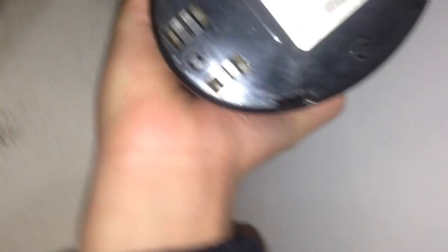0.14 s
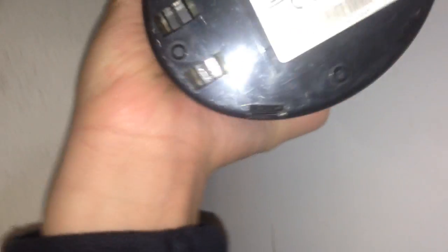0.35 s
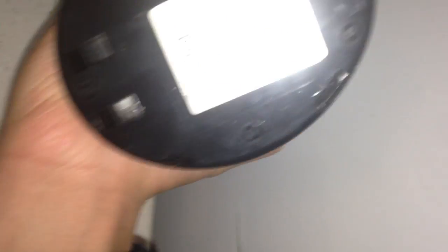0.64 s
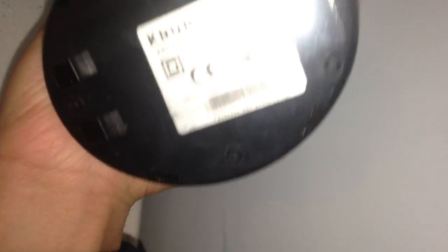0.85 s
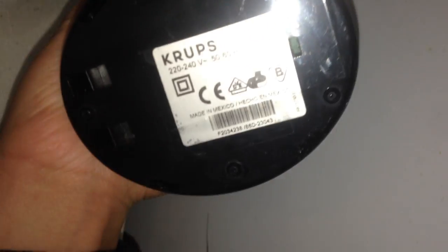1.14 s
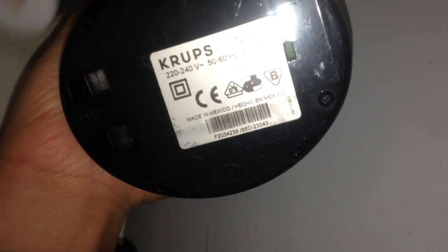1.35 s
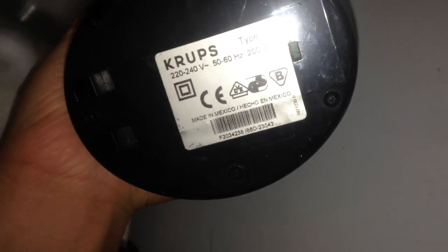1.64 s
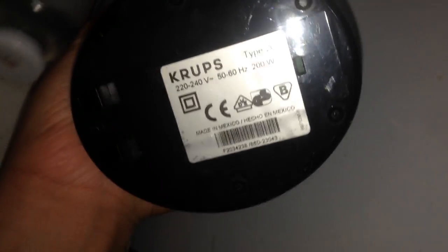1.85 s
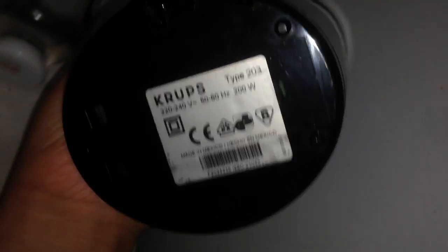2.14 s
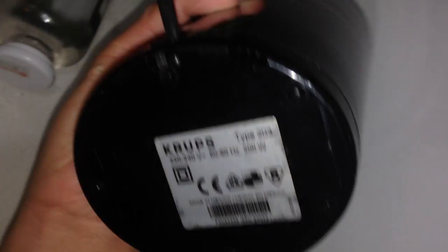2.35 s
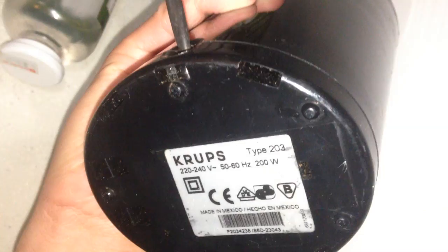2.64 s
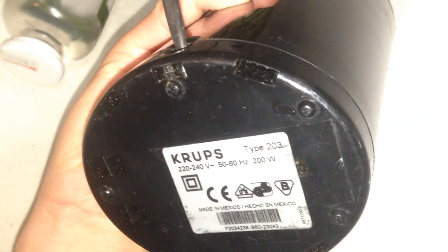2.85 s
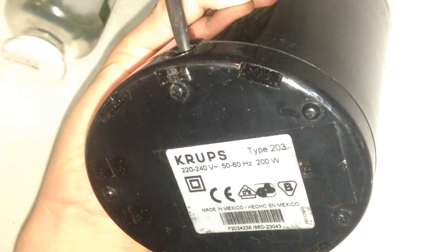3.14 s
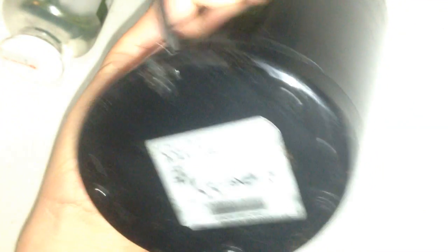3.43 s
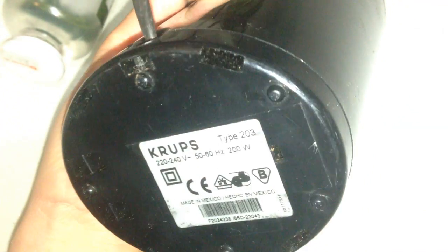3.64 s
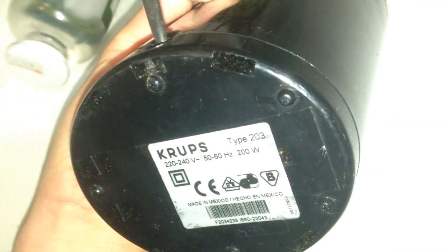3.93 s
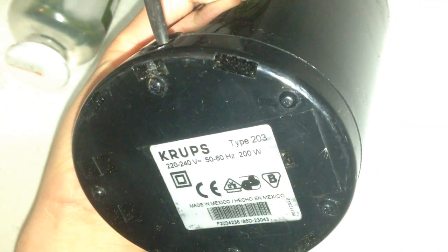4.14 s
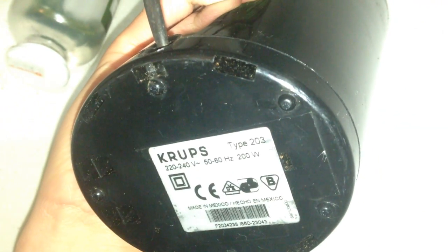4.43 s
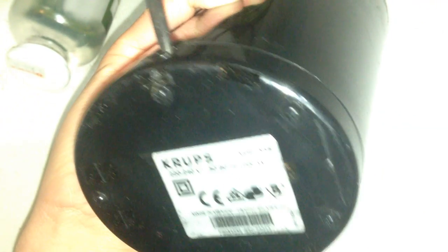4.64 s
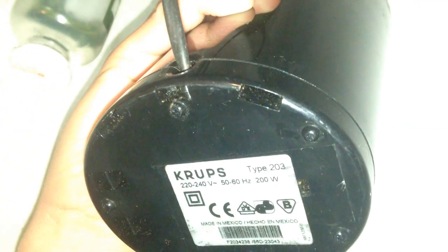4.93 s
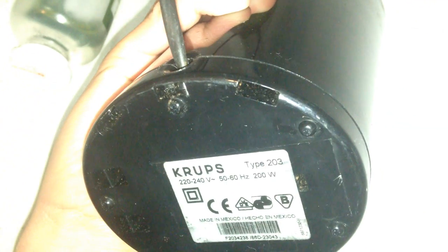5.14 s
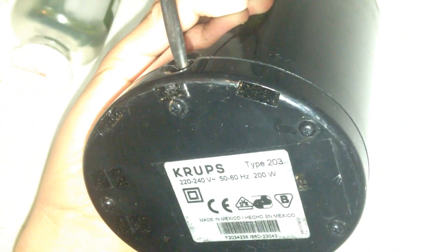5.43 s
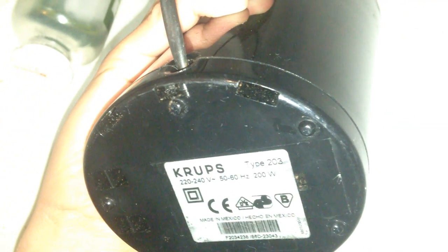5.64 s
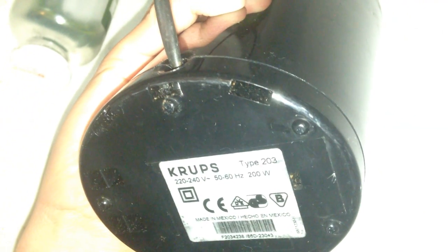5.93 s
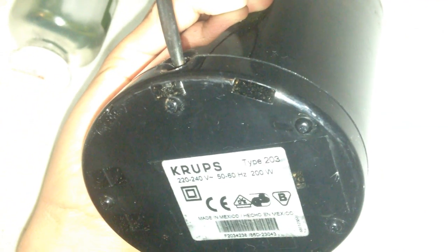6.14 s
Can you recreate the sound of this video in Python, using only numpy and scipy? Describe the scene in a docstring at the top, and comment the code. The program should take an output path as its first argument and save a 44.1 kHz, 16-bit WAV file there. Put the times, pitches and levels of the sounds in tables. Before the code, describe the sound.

A soft room rumble sits behind a close microphone in a kitchen, with two faint handling ticks at the very start. At about 1.2 seconds the plastic housing of a small electric blade grinder rocks on the worktop, knocking loudest around 1.4 seconds, then clattering faster and lighter with tiny squeaks until it rests at 2.5 seconds. After a quiet second, the switch clicks at 3.5 seconds and the empty motor whines quickly up in pitch, with a strong hum and a bright, raspy hiss. At about 4.7 seconds it switches off and coasts down, the tone falling over rasping bearings. Near 5.1 seconds a low buzz drops away with a soft pop. The whir keeps slowing and fading until the end at about 6.3 seconds. The walls add a short reverberation.

```python
"""A kitchen worktop, one microphone close to a small electric blade grinder, soft room rumble behind.
After faint handling ticks, its plastic housing rocks on its rim, squeaks and clatters to rest.
The lid clicks the switch and it runs empty: the brush motor whines up to speed, with a hum from its
unbalance, a blade tone and brush hiss. Switched off, it coasts down on rasping bearings, with a soft
pop as the low buzz drops away. The kitchen walls add a short reverberation."""
import sys
import numpy as np
from scipy import signal
from scipy.fft import rfft, irfft, next_fast_len
from scipy.io import wavfile
from scipy.ndimage import uniform_filter1d, minimum_filter1d, map_coordinates

SR = 44100
rng = np.random.default_rng(int(sys.argv[2]) if len(sys.argv) > 2 else 0)


def digitize_waveform(pressure):
    """Quantize a signal to 16-bit integers and store it at the path in sys.argv[1].

    Rows of a 2-D input are taken as channels; values are limited to [-1, 1].
    """
    field = np.atleast_2d(pressure).T
    bounded = np.clip(field, -1, 1)
    quanta = np.round(bounded * 32767).astype(np.int16)
    wavfile.write(sys.argv[1], SR, quanta)


N = 276948

ON_S, OFF_S = 3.484, 4.688  # the motor is powered between these times
MAINS_HZ, TOP_HZ = 50, 15500
FREE_HZ = 522.4  # turns a second that the powered motor tends toward
FLAT_THUMP_DB, FLAT_CLICK_DB = 9.5, 18  # what a flat landing adds to thump and click
# Faint handling ticks, then knocks of the housing on the worktop. Each row: start in seconds,
# level in dB, flatness of the landing from 0 to 1, hard-edge treble in dB.
CONTACTS = [(0.0513, -39.5, 0.13, -17), (0.1993, -44.5, 0.2, -12), (1.217, -49.5, 0.73, -3),
            (1.2475, -18.5, 0.2, -7.5), (1.3038, -5, 0.79, -5), (1.4117, -0.5, 0.05, -17),
            (1.5013, -7.5, 0.2, -6.5), (1.5415, -8, 0.47, -19.5), (1.575, -6, 0.07, -5.5),
            (1.6511, -5, 0, -10), (1.718, -13, .35, -2.5), (1.7434, -9, 0.56, -23.5),
            (1.7709, -10.5, 0.16, -4), (1.8249, -9, 0, -6), (1.8716, -14, .15, -2.5),
            (1.916, -12, 0.69, -5.5), (1.9896, -10, 0.3, 0), (2.0506, -13, 0.67, -1.5), (2.094, -17, 0, -4),
            (2.125, -23.5, 0.4, -0.5), (2.1544, -18, 0.34, -8), (2.1756, -27.5, 0.72, -5),
            (2.2169, -11, 0.04, -3.5), (2.2584, -18.5, 0.26, -17), (2.2694, -22, 0, -1),
            (2.2921, -23, .1, -2), (2.3159, -23.5, 0.2, -5), (2.3274, -19, 0, -10), (2.36, -19, 0.1, -1),
            (2.379, -23.5, 0.1, -9), (2.3974, -20.5, 0.2, 0), (2.4562, -25, 0.44, 2.5),
            (2.4832, -30.5, 0.14, -1), (2.5032, -32, 0.14, -3)]
# Switch clicks as the lid is pressed; last, a soft pop as the low buzz cuts off.
# Each row: start in seconds, level in dB, thud over tick in dB.
CLICKS_AND_POP = [(3.484, -26.5, -15), (3.489, -24.5, -1.5), (3.4927, -17.5, -3.5), (3.4964, -34.5, 8.5),
                  (5.123, -45, 10.5)]
BUZZ_DROP_S = CLICKS_AND_POP[-1][0]


def amp(db):
    return 10 ** (np.asarray(db) / 20)


def unit(x):
    return x / np.sqrt(np.mean(x ** 2) + 1e-20)


def along(points, hz):
    """Read (Hz, value) points at hz, on a log frequency axis."""
    freqs, values = np.transpose(points)
    return np.interp(np.log(hz + 1), np.log(freqs + 1), values)


def timeline(points):
    """Read (seconds, value) points at every sample."""
    return np.interp(np.arange(N) / SR, *np.transpose(points))


def wobble(rate):
    """A smooth random curve, rate knots a second."""
    return map_coordinates(rng.standard_normal(int(N * rate / SR) + 4), [np.arange(N) * rate / SR])


def filtered(x, response):
    """x through a gain given as a function of frequency."""
    size = next_fast_len(len(x) + SR // 8)
    return irfft(rfft(x, size) * response(np.fft.rfftfreq(size, 1 / SR)), size)[:len(x)]


def coloured(x, spectrum):
    """x shaped by (Hz, dB) points, at rms 1."""
    return unit(filtered(x, lambda hz: amp(along(spectrum, hz))))


def noise(length, spectrum):
    return coloured(rng.standard_normal(length), spectrum)


def decay(t, t60):
    return amp(-60 * t / t60)


def after(start, fade):
    """0 before start, rising to 1 within fade seconds."""
    return np.clip((np.arange(N) / SR - start) / fade, 0, 1)


def mains_phase():
    """Phase of the motor's pull, which throbs with each half wave of the mains."""
    return 2 * np.pi * 2 * MAINS_HZ * np.arange(N) / SR


def air(gain_db=2):
    """Room tone: a soft, slightly wavering rumble."""
    # Colour of the room air. Each row: frequency in Hz, spectral level in dB.
    spectrum = [(15, -52), (25, -31), (101, -5), (140, 0.5), (340, -13), (445, -12), (482, -17.5),
                (703, -22), (1240, -20.5), (2630, -29.5), (15500, -41)]
    # Its slow drift. Each row: time in seconds, level in dB.
    drift = [(0, -48), (.3, -55), (1.15, -53.5), (2.7, -57.5), (6.28, -55)]
    return amp(timeline(drift) + gain_db + 0.87 * wobble(12)) * noise(N, spectrum)


def kitchen(x):
    """The walls answer 5 ms after the direct sound; each frequency dies at its own rate."""
    # Reverberation. Each row: frequency in Hz, t60 in seconds.
    decay_times = [(150, 0.29), (1500, 0.19), (5000, 0.2), (14000, 0.14)]
    hz, t, bands = signal.stft(rng.standard_normal(SR // 2), SR, nperseg=256)
    tail = signal.istft(bands * decay(t, along(decay_times, hz)[:, None]), SR, nperseg=256)[1]
    return signal.fftconvolve(x, np.pad(tail / np.linalg.norm(tail), (round(.005 * SR), 0)))[:N]


def rolling(gain_db=-1):
    """The rocking rim grumbles on the worktop between knocks."""
    # Course of the roll. Each row: time in seconds, level in dB.
    levels = [(1.19, -78), (1.22, -39.5), (1.4, -43), (1.6, -43.5), (2.3, -33), (2.55, -45), (2.61, -75.5)]
    # Colour of the rolling rim. Each row: frequency in Hz, spectral level in dB.
    spectrum = [(60, -34.5), (125, 5.5), (160, 1.5), (250, -8.5), (400, -26), (700, -16), (1500, -19.5),
                (2400, -30.5), (5000, -57)]
    return amp(timeline(levels) + gain_db + 4 * wobble(35)) * noise(N, spectrum)


def slides(gain_db=-29, swell_s=0.0037):
    """The plastic squeaks as it slides into each contact, then stops."""
    # Colour of the squeak. Each row: frequency in Hz, spectral level in dB.
    spectrum = [(1200, -25), (2300, 1.5), (2750, -1), (3100, 1), (3700, -25.5), (8000, -33)]
    out, t = np.zeros(N + SR), np.arange(-SR // 25, 0) / SR
    for start, db, flat, _ in CONTACTS:
        squeak = noise(len(t), spectrum) * np.exp(t / swell_s)
        out[round(start * SR) - len(t):][:len(t)] += amp(db + gain_db + FLAT_THUMP_DB * flat) * squeak
    return out[:N]


def ticks_and_knocks(ring_db=-9.0, clack_db=-8.0, click_db=-22.5, thump_db=-7.0, edge_db=5):
    """Each contact rings the housing; a flat landing thumps, a hard edge brings out the high modes."""
    # Modes of the housing on the worktop. Each row: frequency in Hz, level in dB, t60 in seconds.
    modes = [(147.6, -11, 0.12), (158.6, 6, 0.041), (337.4, -0.5, 0.041), (363, -11, 0.065),
             (527.6, -6, 0.057), (786, -9.5, 0.05), (1501, -14.5, 0.18), (1248, -5, .05),
             (1322, 3.5, 0.024), (1497, 3, 0.057), (1613, -8, 0.063), (1724, -7.5, 0.048),
             (2250, -2, 0.025), (2348, 4, 0.021), (3100, -2.5, 0.021), (3474, -3, 0.019),
             (4050, -8.5, 0.032)]
    # The housing's dense short ring. Each row: frequency in Hz, spectral level in dB.
    clack_spectrum = [(25, -40), (80, -28.5), (150, -6), (500, 2), (900, 0), (1400, 3.5), (2400, 1.5),
                      (2750, -23), (3100, -13), (4300, -7.5), (5200, -50), (15000, -53)]
    # The click of the contact. Each row: frequency in Hz, spectral level in dB.
    click_spectrum = [(1500, -31), (4000, 1.5), (6000, -2), (8500, -4), (11000, -9.5), (15500, -19.5)]
    light_thump, light_click = 0.37, 0.3  # dB per dB: lighter contacts have more thump and click
    out, t = np.zeros(N + SR), np.arange(SR // 4) / SR
    hz, mode_db, t60 = np.transpose(modes)[:, :, None]
    attack = 1 - np.exp(-t / 0.0005)
    for start, db, flat, edge in CONTACTS:
        bass_db = thump_db + FLAT_THUMP_DB * flat - light_thump * db
        contact = [(600, bass_db), (1150, 0.0081), (1750, 0.0052), (2200, edge + edge_db)]  # Hz, dB
        sizes = amp(mode_db + along(contact, hz) + rng.normal(0, 1.5, hz.shape))
        sines = np.sin(2 * np.pi * hz * t + rng.normal(0, 1, hz.shape))
        ring = np.sum(sizes * decay(t, t60) * sines * (1 - np.exp(-hz * t)), axis=0)
        clack = filtered(noise(len(t), clack_spectrum), lambda f: amp(along(contact, f)))
        clack *= decay(t, t60=0.043)
        click = noise(len(t), click_spectrum) * decay(t, t60=0.023)
        click *= amp(click_db + FLAT_CLICK_DB * flat - light_click * db)
        blow = amp(ring_db) * ring + amp(clack_db) * clack + click
        out[round(start * SR):][:len(t)] += amp(db) * blow * attack
    return out[:N]


def clicks_and_pop():
    """The switch clicks, damped by the hand on the lid; later a soft pop as the low buzz cuts off."""
    # The bright tick. Each row: frequency in Hz, spectral level in dB.
    tick_spectrum = [(300, -10), (900, -5.5), (1800, 4), (2800, -6.5), (4000, 0), (7000, -8.5),
                     (15000, -21.5)]
    # The dull thud. Each row: frequency in Hz, spectral level in dB.
    thud_spectrum = [(25, -50), (70, -33), (160, -6), (330, -2), (480, 0.5), (700, -24), (1100, -13),
                     (2500, -31.5)]
    out, t = np.zeros(N + SR), np.arange(SR // 8) / SR
    for start, db, thud_db in CLICKS_AND_POP:
        tick = noise(len(t), tick_spectrum) * decay(t, t60=0.017)
        thud = noise(len(t), thud_spectrum) * decay(t, t60=0.055)
        out[round(start * SR):][:len(t)] += amp(db) * (tick + amp(thud_db) * thud)
    return out[:N]


def shaft(jolt_hz=101.2, spin_up_s=.251, spin_up_exponent=1.413, drag_s=3.147, brake_hz_per_s=194.2):
    """Speed, angle and power (0-1): the motor jolts and spins up, then air drag and bearings slow it."""
    t = np.arange(N) / SR
    driven_s, coasted_s = np.clip(t, ON_S, OFF_S) - ON_S, np.maximum(t - OFF_S, 0)
    reached_hz = FREE_HZ - (FREE_HZ - jolt_hz) / (1 + driven_s / spin_up_s) ** spin_up_exponent
    brake_hz = brake_hz_per_s * drag_s
    hz = (reached_hz + brake_hz) * np.exp(-coasted_s / drag_s) - brake_hz
    angle = 2 * np.pi * np.cumsum(hz * (1 + .0012 * wobble(45))) / SR
    power = after(ON_S, .002) * (1 - after(OFF_S, 0.018))
    return hz, angle, power


def cavity(x, t60=.035):
    """Echoes inside the housing: gliding tones flutter as they cross its dense resonances."""
    t = np.arange(SR // 16) / SR
    echoes = rng.standard_normal(len(t)) * decay(t, t60)
    return signal.fftconvolve(x, echoes / np.linalg.norm(echoes))[:N]


def rub_db(hz, power, base_db, decade_db, powered_db, surge_db, drop_db):
    """Level of a rubbing contact: it follows speed and current, and steps down with the buzz."""
    critical_hz, width_hz, critical_db = 239, 40, 3  # the freed shaft shakes most around this speed
    speed = hz / FREE_HZ
    current_db = power * (powered_db + surge_db * (1 - speed))
    shake_db = critical_db * (1 - power) * np.exp(-((hz - critical_hz) / width_hz) ** 2)
    return base_db + decade_db * np.log10(speed) + current_db + shake_db + drop_db * after(BUZZ_DROP_S, 0.021)


def bearings_db(hz, power):
    """Level of the bearings' rattle, raised by the starting surge."""
    return rub_db(hz, power, base_db=-28.5, decade_db=25.5, powered_db=-2.5, surge_db=8.5, drop_db=-3.5)


def brushes_db(hz, power, chatter_db=2, chatter_hz=458, width_hz=22):
    """Level of the brush hiss; the brushes chatter hardest just below full speed."""
    hiss = rub_db(hz, power, base_db=-29.5, decade_db=23.5, powered_db=1.9, surge_db=-0.5, drop_db=-2.5)
    return hiss + chatter_db * power * np.exp(-((hz - chatter_hz) / width_hz) ** 2)


def scrape(hz, angle, slip_rad=.03):
    """The same rough spots pass once a turn: an uneven comb of high orders, smeared by shaft play."""
    loose_angle = angle + slip_rad * wobble(70)
    comb = np.zeros(N)
    for order in range(9, 60):
        size = (order * hz < TOP_HZ) * rng.uniform(.5, 1.38)
        comb += size * np.sin(order * loose_angle + rng.uniform(0, 2 * np.pi))
    return cavity(comb * np.sqrt(4 * hz / SR))  # as strong per Hz as white noise


def friction(hz, angle, power, driven_comb_db=-8, coast_comb_db=0.5, rattle_db=-3.0, split_hz=3500):
    """Bearings (low band) and brushes (high) rasp in time with the shaft; sparks throb with the mains."""
    # Friction under power. Each row: frequency in Hz, spectral level in dB.
    driven_spectrum = [(40, -44), (150, -34), (450, -11.5), (850, -22.5), (1400, -11), (2100, -3.5),
                       (2500, -6.5), (2850, -13.5), (3500, -7), (4500, -6.5), (7000, -9), (10400, -13.5),
                       (13000, -19.5), (15500, -22)]
    # Friction while coasting. Each row: frequency in Hz, spectral level in dB.
    coasting_spectrum = [(250, -26), (680, -24), (1150, -21.5), (1750, -9), (2080, -0.5), (2400, -10),
                         (2850, -14), (3650, -7), (5000, -2), (6600, -8), (8800, -13.5), (10900, -9),
                         (13000, -17.5), (15500, -23.5)]
    throb = 1 + .18 * power * np.sin(mains_phase())
    grit = unit(rng.standard_normal(N) * amp(3.2 * np.sin(angle) + 0.62 * wobble(150)))
    comb_gain = amp(coast_comb_db + power * (driven_comb_db - coast_comb_db)) * after(ON_S, 0.23)
    rasp = throb * (grit + comb_gain * scrape(hz, angle)) / np.sqrt(1 + comb_gain ** 2)
    driven, coasting = coloured(rasp, driven_spectrum), coloured(rasp, coasting_spectrum)
    blend = after(OFF_S, .55)

    def lowpass(f):
        return 1 / (1 + (f / split_hz) ** 8)

    def band(response):
        return (1 - blend) * unit(filtered(driven, response)) + blend * unit(filtered(coasting, response))

    rattle = amp(bearings_db(hz, power) + rattle_db) * band(lowpass)
    hiss = amp(brushes_db(hz, power)) * band(lambda f: 1 - lowpass(f))
    return after(ON_S, .002) * (rattle + hiss)


def shaft_buzz(hz, angle, power, flutter_db=2, swell_db=4, swell_s=0.18):
    """The shaft knocks in its bearings: a low buzz that swells while coasting, then drops suddenly."""
    # Overtones of the knocking. Each row: multiple of the shaft speed, relative level in dB.
    overtones = [(2, -15), (3, -11), (5, -7.5), (6, -9), (7, -13), (9, -10.5), (10, -16), (14, -18),
                 (17, -15)]
    swell = after(BUZZ_DROP_S - swell_s, swell_s / 2) * (1 - after(BUZZ_DROP_S, 0.03))
    drop_db = 4 * after(BUZZ_DROP_S, 0.031) + 3.5 * after(5.56, 0.14)
    level_db = bearings_db(hz, power) + swell_db * swell - drop_db
    throb = 1 + 0.58 * power * np.sin(mains_phase())
    wander_rad = 0.45 * (1.3 - power)  # freed of the magnetic pull, the shaft wanders more
    buzz = sum(amp(db + flutter_db * wobble(11)) * np.sin(round(order) * angle + wander_rad * wobble(45))
               for order, db in overtones)
    echo_share = .8 * after(4.5, 0.35)
    buzz = np.sqrt(1 - echo_share) * buzz + np.sqrt(echo_share) * cavity(buzz)
    return amp(level_db) * throb * buzz * after(3.6, 0.12)


def armature(angle, power, strain, play_rad=0.11):
    """The slots whine at eight times the shaft speed; the throbbing pull adds side tones."""
    mains = mains_phase()
    inrush = power * (1 - after(4.164, 0.11))  # the current is high until the rotor nears full speed
    slot = 8 * angle + play_rad * strain * wobble(130)
    whine = np.sin(slot) + .6 * power * np.cos(slot - mains) + inrush * np.sin(slot + mains)
    whine += .28 * power * (np.sin(slot - 2 * mains) + np.sin(slot - angle + mains))
    whine += .55 * inrush * after(3.95, .15) * np.sin(slot + 2 * angle + mains)
    whine += inrush * after(3.68, .1) * (.35 * np.sin(5 * angle) + .28 * np.sin(3 * angle))
    echo_share = after(OFF_S, 0.11)  # coasting, it sweeps quickly through the housing's resonances
    return np.sqrt(1 - echo_share) * whine + np.sqrt(echo_share) * cavity(whine)


def motor_tones(hz, angle, power, hum_db=-1.0, blade_db=-29, whine_db=-42, powered_db=7.0, surge_db=7):
    """Unbalance hums once a turn, the blade sings at four, the slots at eight; resonances swell each."""
    # The body's response to the unbalance. Each row: shaft speed in Hz, level in dB.
    body = [(170, -58), (205, -49), (268, -54), (340, -33), (387, -28.5), (420, -32), (452, -24.5),
            (483, -24.3)]
    # How the shell passes blade tone and whine. Each row: frequency in Hz, gain in dB.
    shell = [(1250, -20), (1490, -3.5), (1740, -9), (1860, -4), (1960, 3), (2550, 0), (2900, -4.5),
             (3380, -3), (3640, 4), (3880, -2)]
    mains = mains_phase()
    hum = amp(along(body, hz) + hum_db + 0.5 * power) * np.sin(angle)
    hum *= 1 + 0.04 * power * np.sin(mains)

    speed_db, flutter_db = 45 * np.log10(hz / FREE_HZ), 5.5 * wobble(30)
    blade = np.sin(4 * angle) + .35 * power * np.sin(4 * angle + mains)
    blade *= amp(along(shell, 4 * hz) + blade_db + speed_db + flutter_db)

    strain = 1 - 1.7 * after(3.79, 0.41)  # the armature shudders most in the first surge
    current_db = power * (powered_db + surge_db * (1 - hz / FREE_HZ))
    whine = armature(angle, power, strain)
    whine *= amp(along(shell, 8 * hz) + whine_db + current_db + 3 * strain * wobble(130))
    return np.sqrt(2) * (hum + blade + whine) * after(3.548, 0.045) * (1 - after(5.7, .5))


def scene():
    """The grinder close up, the walls and room tone well below it."""
    hz, angle, power = shaft()
    clatter = ticks_and_knocks() + slides() + clicks_and_pop() + rolling()
    rasp = friction(hz, angle, power)
    tones = motor_tones(hz, angle, power) + shaft_buzz(hz, angle, power)
    walls = kitchen(amp(-12.5) * clatter + amp(-11.5) * rasp + amp(-12.0) * tones)
    return np.array([clatter + rasp + tones + walls + air()] * 2)


def record(dry, ceiling=0.8, hold_s=.005):
    """One microphone on both channels; a fast limiter holds the hardest knocks, then a cut at TOP_HZ."""
    span = round(hold_s * SR)
    needed = np.minimum(1, ceiling / (np.abs(dry[0]) + 1e-9))
    gain = uniform_filter1d(minimum_filter1d(needed, 2 * span + 1), span)
    return np.array([filtered(gain * channel, lambda hz: hz < TOP_HZ) for channel in dry])


dry = scene()
out = record(dry)
digitize_waveform(out)
```